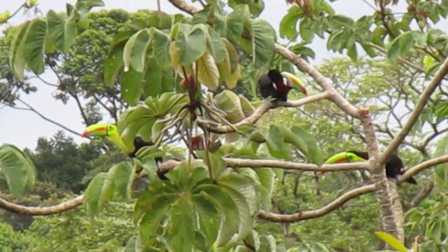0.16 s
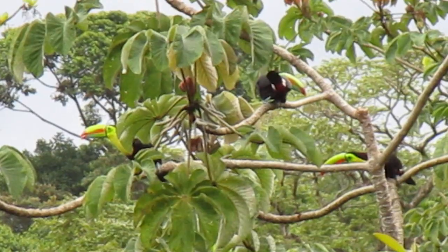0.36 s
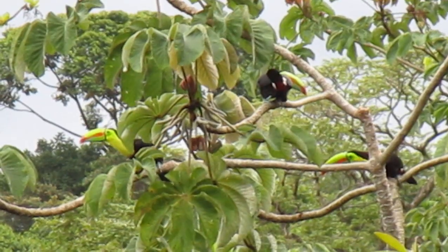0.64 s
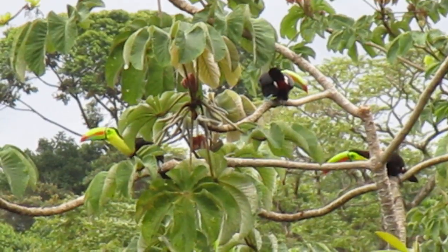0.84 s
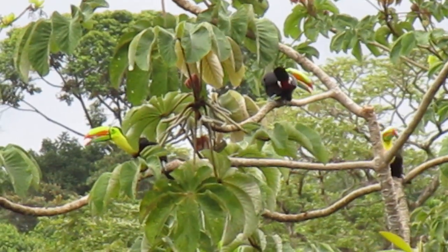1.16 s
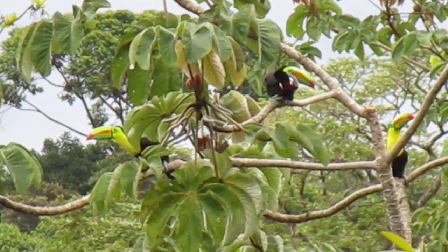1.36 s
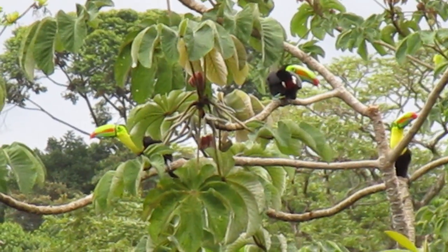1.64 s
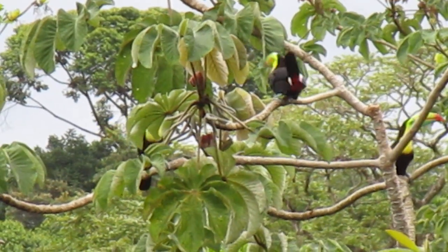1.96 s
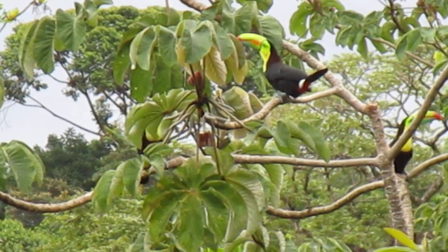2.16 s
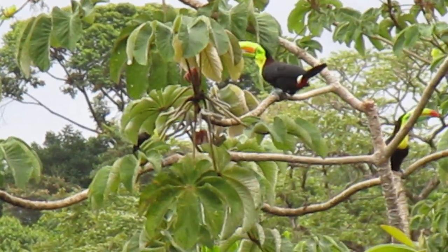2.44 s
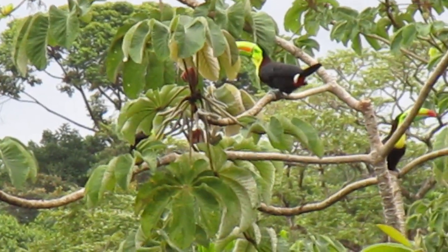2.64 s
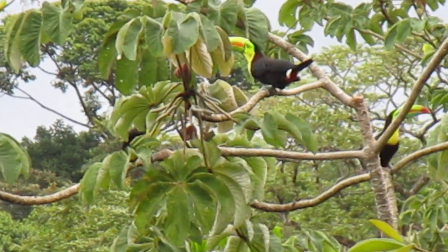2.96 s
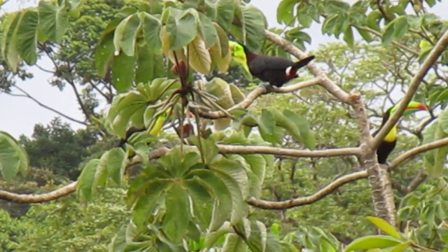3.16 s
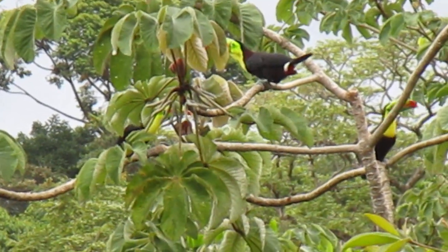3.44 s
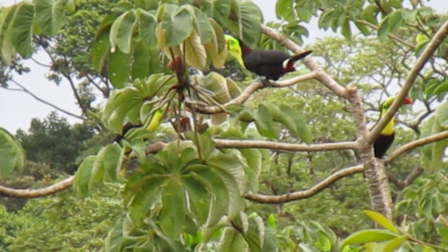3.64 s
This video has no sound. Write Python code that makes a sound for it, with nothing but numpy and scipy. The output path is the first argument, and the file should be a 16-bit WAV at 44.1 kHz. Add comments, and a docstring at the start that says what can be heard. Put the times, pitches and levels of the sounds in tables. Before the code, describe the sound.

Rattles and clacks come first, then a louder fast toucan croak answers, and the pair keeps cycling steadily to the end. Hoarse rasps farther off, thin insect hiss and soft forest wash lie behind, recorded outdoors.

```python
"""From the start: a steady chorus of insect bands, a far hum and forest wash, all filtered noise.
At once a hoarse far rasp (pulsed noise), slow harsh rattles and clacks, alone or in short runs, of reedy pips,
scattered by the trees; then a faint low bump and a small bird's thin chirp. From a third of a second a toucan's
fast purr joins in, and the treetop birds take turns about every two thirds of a second. Midway, a brief, very
high buzz. Each pip is a few ms of gliding partials, throat noise and a hissy puff."""
import sys
import numpy as np
from scipy import signal
from scipy.fft import rfft, irfft
from scipy.io import wavfile
from scipy.ndimage import uniform_filter1d

SR = 44100
rng = np.random.default_rng(int(sys.argv[2]) if len(sys.argv) > 2 else 0)


def persist_wave(psi):
    """Save psi, clipped to +-1, as 16-bit WAV."""
    counts = np.round(np.clip(psi, -1, 1) * 32767).astype(np.int16)
    wavfile.write(sys.argv[1], SR, np.atleast_2d(counts).T)


N = 167580

# insect bands and a far hum: f/Hz, width/Hz, level/dB
DRONE_BANDS = [(5860, 70, -58), (5900, 540, -54.5), (6670, 50, -62), (7610, 95, -61.5), (7493, 320, -53.5),
               (7860, 160, -60.5), (117.4, 24, -57)]
# forest wash, relative spectrum: f/Hz, density/dB per Hz
AIR_SPECTRUM = [(20, -3), (45, -8), (80, -1), (160, 1), (750, 1.5), (1400, -0.5), (2100, 3), (3000, -5.5),
                (4500, -9), (7000, -13), (9000, -19.5), (15000, -30)]
# hoarse rasps of a bird further off: middle t/s, length/s, level/dB
RASP_EVENTS = [(0.004, 0.098, -37.5), (0.617, 0.17, -42.5), (1.29, 0.18, -41.5), (1.89, 0.63, -44),
               (2.514, 0.18, -39), (3.163, 0.43, -44), (3.735, 0.33, -43.5)]
# throat resonance of the rasps: f/Hz, gain/dB
RASP_THROAT = [(1000, -60), (1600, -14), (1950, -3), (2250, -4.5), (2700, -23.5), (3700, -13), (4600, -19),
               (7000, -52)]
# reverberation of the trees: f/Hz, t60/s
FOREST_T60 = [(300, 0.23), (1800, 0.6), (3500, 0.72), (5200, 0.63), (12000, 0.058)]
# treble lost from beamed rattles on the way to the trees: f/Hz, gain/dB
OFF_AXIS_GAIN = [(2300, -1), (3500, -2), (5300, -8.5)]
# slow rattles: last pip t/s, level/dB, pip spacing/s, pips, last pitch f/Hz, overtones/dB,
# swell/dB per pip, last roughness/0-1, last pitch jump/share
RATTLE_EVENTS = [(.051, -25, 0.023, 3, 1934, -26, 0, 0.6, 0.048),
                 (0.604, -22, 0.026, 4, 1770, -3, 3, 0.82, 0.0035),
                 (.669, -27.5, 0.026, 3, 1990, -13, -2.5, 0.74, .125),
                 (1.259, -23.5, 0.023, 5, 1790, -1, 2, .6, 0.023),
                 (1.353, -24.5, 0.027, 4, 1830, -12, 0.7, 0.83, 0.041),
                 (1.898, -21.5, .0245, 3, 1877, 2, 6, 0.15, 0.083),
                 (2.007, -23.5, 0.028, 3, 1848, -14, 0.5, 0.42, 0.034),
                 (2.483, -20.5, 0.025, 2, 1749, -1, 7.5, 0.21, 0.0027),
                 (2.583, -29, .0245, 3, 1922, -2.5, -1, 0.62, 0.0607),
                 (3.115, -22.5, 0.025, 2, 1770, -3.5, -3, 0.34, 0.019),
                 (3.231, -20.5, 0.026, 4, 1785, -14, 2.1, 0.56, 0.024),
                 (3.757, -22, 0.022, 3, 1780, -6, 0, 0.37, 0.027)]
# partials of a rattle pip: multiple of pitch, level/dB
RATTLE_PARTIALS = [(1, -4), (1.99, -11), (2.95, -4), (3.95, -21), (5, -28), (6, -33)]
# throat and beak, passing little that is low: f/Hz, gain/dB
BEAK_GAIN = [(900, -33), (1350, -11), (1620, 3), (15000, -2.5)]
# soft low bumps on the microphone: t/s, level/dB
BUMP_EVENTS = [(.085, -53), (3.07, -57)]
# clacks, alone or in short runs: t/s, level/dB, pitch f/Hz
CLACK_EVENTS = [(0.0232, -23, 1810), (.444, -41, 1768), (.657, -28.5, 1830), (1.059, -27, 1675),
                (1.291, -25.5, 1800), (1.340, -27.5, 1864), (1.909, -25.5, 2085), (1.919, -29.5, 1745),
                (1.943, -24.5, 1718), (1.969, -24, 1740), (2.411, -33, 1700), (2.516, -29.5, 2010),
                (2.571, -28, 1860), (2.596, -29.5, 2117), (2.998, -29, 1690), (3.065, -27.5, 1750),
                (3.144, -29, 1785), (3.509, -28, 1762), (3.521, -25, 1730), (3.535, -29, 1761),
                (3.747, -27, 1915)]
# partials of a clack: multiple of pitch, level/dB
CLACK_PARTIALS = [(1, 0), (1.93, -12.5), (2.8, -18.5)]
# faint trills of a small bird: first tick t/s, level/dB
CHIRP_EVENTS = [(0.134, -47.5), (2.859, -49)]
# fast croaks: last strong pip t/s, level/dB, pip spacing/s, fast pips, pitch f/Hz, overtones/dB,
# dulling/dB per pip
CROAK_EVENTS = [(.408, -16.5, .0113, 4, 1745, -5, 1), (1.033, -19, .012, 4, 1735, -1, .5),
                (1.670, -20, .012, 4, 1738, -1, .5), (2.323, -18, .0118, 5, 1742, -1, 1.7),
                (2.966, -17, .0118, 6, 1742, -1.5, 3.5), (3.632, -19.5, .0118, 5, 1755, 3, 2.5)]
# partials of a croak pip: multiple of pitch, level/dB
CROAK_PARTIALS = [(1, -2), (1.98, -11), (2.92, -7.5), (3.82, -20), (4.85, -31), (6.85, -35.5), (7.7, -45)]

AIR_DB, AIR_PATCH_DB = -41, 0.67
FOREST_DB, LEAVES_DB, LEAVES_T60_S = -4.5, -11.5, .11
PIP_RELEASE_RATIO, PIP_GLIDE_PER_S, PITCH_SCATTER_SHARE = 1.29, 2.55, 0.0208
WOBBLE_SHARE, WOBBLE_HZ, OVERTONE_WOBBLE, STUTTER_HZ = 0.1115, 770, 0.36, 295
THROAT_DB, THROAT_HZ, THROAT_WIDTH_HZ = -4, 2150, 520
PUFF_DB, PUFF_HZ, PUFF_WIDTH_HZ = -29, 8000, 6500
RATTLE_PIP_S, RATTLE_DULL_DB, RATTLE_ROUGH = .0028, -2.5, .12
CLACK_PIP_S, CLACK_ROUGH = 0.0021, .15
CROAK_PIP_S, CROAK_SWELL_DB, CROAK_RISE_SHARE, CROAK_ROUGH = .0024, 2.5, 0.00788, .1
LEAD_GAP_S, LEAD_OVERTONES_DB = .0215, -7
CLOSE_GAP_S, CLOSE_DB, CLOSE_ROUGH = 0.0108, -26.5, 0.45
BUZZ_START_S, BUZZ_END_S, BUZZ_HZ, BUZZ_WIDTH_HZ, BUZZ_DB = 1.17, 1.62, 14200, 1100, -61
EDGE_HZ = 15050


def amp(db):
    """Decibels to gain."""
    return 10 ** (np.asarray(db) / 20)


def unit(x):
    """Scales to rms 1."""
    return x / np.sqrt(np.mean(x ** 2) + 1e-20)


def read(points, hz):
    """Reads a spectrum on a log-frequency axis."""
    f, value = np.transpose(points)
    return np.interp(np.log(hz + 1), np.log(f), value)


def colour(x, points):
    """Filters by a spectrum."""
    gain = amp(read(points, np.fft.rfftfreq(2 * N, 1 / SR)))
    return irfft(rfft(x, 2 * N) * gain)[:N]


def add(mix, s, sound):
    """Mixes in a sound centred on time s."""
    at = round(s * SR) - len(sound) // 2
    sound = sound[max(-at, 0):]
    part = mix[max(at, 0):][:len(sound)]
    part += sound[:len(part)]


def band(size, hz, width_hz):
    """Noise of rms 1 in one bell-shaped band, -3 dB at its full width."""
    f = np.fft.rfftfreq(size, 1 / SR)
    bell = np.exp(-2 * np.log(2) * ((f - hz) / width_hz) ** 2)
    return unit(irfft(rfft(rng.standard_normal(size)) * bell, size))


def pip(voice, hz, width_s, overtones_db, rough):
    """One puff through the syrinx: a short reedy tone; harsh pips wobble, stutter and turn hoarse in the throat."""
    t = np.arange(-1024, 1024) / SR
    side_s = np.where(t < 0, width_s, width_s * PIP_RELEASE_RATIO)
    swell = np.exp(-.5 * abs(t / side_s) ** 3.9)
    stutter = 1 + rough * np.cos(2 * np.pi * STUTTER_HZ * t)
    swell = swell * stutter / np.sqrt(1 + rough ** 2)
    scatter = PITCH_SCATTER_SHARE * rng.uniform(-0.92, 1)
    turns = np.cumsum(hz * (1 + scatter + PIP_GLIDE_PER_S * t)) / SR
    wobble = np.cumsum(hz * WOBBLE_SHARE * rough * band(len(t), 0, WOBBLE_HZ)) / SR
    tone = np.zeros(len(t))
    for k, (multiple, db) in enumerate(voice):
        phase = multiple * turns + (1 + OVERTONE_WOBBLE * k) * wobble + rng.random()
        level = amp(db + overtones_db * min(k / 2, 1))  # first overtone takes half the change
        tone += level * np.sin(2 * np.pi * phase)
    throat = amp(THROAT_DB) * rough * band(len(t), THROAT_HZ, THROAT_WIDTH_HZ)
    puff = amp(PUFF_DB + overtones_db) * band(len(t), PUFF_HZ, PUFF_WIDTH_HZ)
    return swell * (tone + throat) + swell ** 2 * puff


def drones():
    """Steady insect bands and a far hum, each a narrow band of noise."""
    return sum(amp(db) * band(N, hz, width_hz) for hz, width_hz, db in DRONE_BANDS)


def air():
    """The wash of the distant forest: shaped noise drifting in soft time-frequency patches."""
    hz = np.fft.rfftfreq(1024, 1 / SR)
    a, b, patches = rng.standard_normal((3, N // 256 + 6, len(hz)))
    patches = uniform_filter1d(patches, size=14, axis=0)
    patches = unit(uniform_filter1d(patches, size=10, axis=1))
    z = (a + 1j * b) * amp(read(AIR_SPECTRUM, hz) + AIR_PATCH_DB * patches)
    wash = signal.istft(z.T, nperseg=1024, noverlap=768)[1][:N]
    return amp(AIR_DB) * unit(wash)


def rasps(rate_hz=43, depth_db=9):
    """Hoarse puffs at an uneven rate in a throat resonance, under one arch of loudness."""
    arches = np.zeros(N)
    for s, length_s, db in RASP_EVENTS:
        add(arches, s, amp(db) * np.hanning(round(length_s * SR)) ** .5)
    turns = np.cumsum(rate_hz * (1 + 0.151 * band(N, 0, 60.4))) / SR
    puffs = amp(depth_db * np.cos(2 * np.pi * turns))
    hiss = colour(rng.standard_normal(N), RASP_THROAT)
    return arches * unit(hiss * puffs)


def forest(x):
    """Quick scatter from nearby leaves and a longer tail from the trees; the paths drift as the birds move."""
    t, out = np.arange(SR) / SR, np.zeros(N)
    for k in range(3):
        taps = rng.standard_normal(SR) * (rng.random(SR) < 4000 / SR) * (1 - np.exp(-t / 0.0018))
        hz, frame_s, z = signal.stft(taps, SR, nperseg=256)
        decay = amp(-60 * frame_s / read(FOREST_T60, hz)[:, None])
        tail = signal.istft(z * decay, SR, nperseg=256)[1][:SR]
        near = rng.permutation(taps) * (t > .004) * amp(-60 * t / LEAVES_T60_S)
        echo = (amp(FOREST_DB) * unit(tail) + amp(LEAVES_DB) * unit(near)) / np.sqrt(SR)
        # three path sets trade places at constant total power
        share = np.sqrt(2 / 3) * np.cos(np.pi * (np.arange(N) / SR / 2 + k / 3))
        out += signal.fftconvolve(x * share, echo)[:N]
    return out


def rattles():
    """Evenly spaced clean pips; the last jumps in pitch and is the harshest."""
    out = np.zeros(N)
    for end, db, gap_s, pips, hz, overtones_db, swell_db, last_rough, jump in RATTLE_EVENTS:
        for k in range(round(pips)):  # k counts back from the last pip
            pip_hz = hz * (1 - jump * (1 - 0.25 ** k))
            bright_db = overtones_db + RATTLE_DULL_DB * k
            rough = RATTLE_ROUGH if k else last_rough
            sound = pip(RATTLE_PARTIALS, pip_hz, RATTLE_PIP_S, bright_db, rough)
            add(out, end - k * gap_s, amp(db - swell_db * k) * sound)
    return out


def bumps(length_s=0.14, hz=50, width_hz=50):
    """Faint low puffs on the microphone."""
    out = np.zeros(N)
    for s, db in BUMP_EVENTS:
        add(out, s, amp(db) * np.hanning(round(length_s * SR)))
    return out * band(N, hz, width_hz)


def clacks():
    """Dull pips among and between the rattles, alone or in short runs, with low-lying overtones."""
    out = np.zeros(N)
    for s, db, hz in CLACK_EVENTS:
        add(out, s, amp(db) * pip(CLACK_PARTIALS, hz, CLACK_PIP_S, 0, CLACK_ROUGH))
    return out


def chirps(gap_s=0.014):
    """Three thin ticks at a time from a small bird, one partial each."""
    out = np.zeros(N)
    for s, db in CHIRP_EVENTS:
        for k in range(3):
            tick = pip([(0.98, 0)], hz=4350, width_s=0.0061, overtones_db=-2, rough=0.222)
            add(out, s + k * gap_s, amp(db) * tick)
    return out


def croaks():
    """Two slow pips lead into a fast purr that swells, rises a little, grows duller and closes on a rough pip."""
    out = np.zeros(N)
    for end, db, gap_s, fast, hz, overtones_db, dulling_db in CROAK_EVENTS:
        fast = round(fast)
        for k in range(fast + 2):  # k counts back from the last strong pip
            s = end - min(k, fast - 1) * gap_s - max(k - fast + 1, 0) * LEAD_GAP_S
            change_db = dulling_db * min(k - 2, 1) if k < fast else LEAD_OVERTONES_DB
            pip_hz = hz * (1 - CROAK_RISE_SHARE * k)
            sound = pip(CROAK_PARTIALS, pip_hz, CROAK_PIP_S, overtones_db + change_db, CROAK_ROUGH)
            add(out, s, amp(db - CROAK_SWELL_DB * k) * sound)
        close = pip(CROAK_PARTIALS, hz, CROAK_PIP_S, overtones_db, CLOSE_ROUGH)
        add(out, end + CLOSE_GAP_S, amp(CLOSE_DB) * close)
    return out


def buzz():
    """One brief, very high band of noise with 30 ms ramps."""
    t = np.arange(N) / SR
    gate = np.clip(np.minimum(t - BUZZ_START_S, BUZZ_END_S - t) / .03, 0, 1)
    return amp(BUZZ_DB) * gate * band(N, BUZZ_HZ, BUZZ_WIDTH_HZ)


def scene():
    """The birds, their echoes and the background."""
    rattling = colour(rattles() + clacks(), BEAK_GAIN)
    others = rasps() + chirps() + croaks()
    echoes = forest(colour(rattling, OFF_AXIS_GAIN) + others)
    background = drones() + air() + bumps() + buzz()
    return (rattling + others + echoes + background)[None]


def record(dry):
    """The recorder's band limit: a linear-phase low-pass."""
    low_pass = signal.firwin(1023, EDGE_HZ, window=("kaiser", 9), fs=SR)
    return signal.oaconvolve(dry, low_pass[None], "same")


dry = scene()
out = record(dry)
persist_wave(out)
```